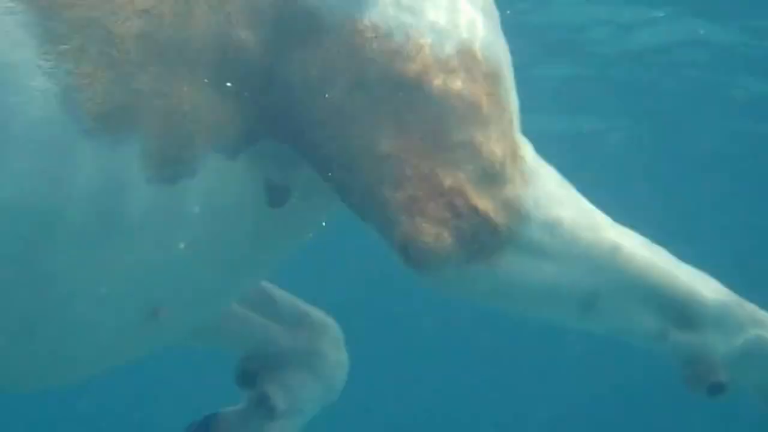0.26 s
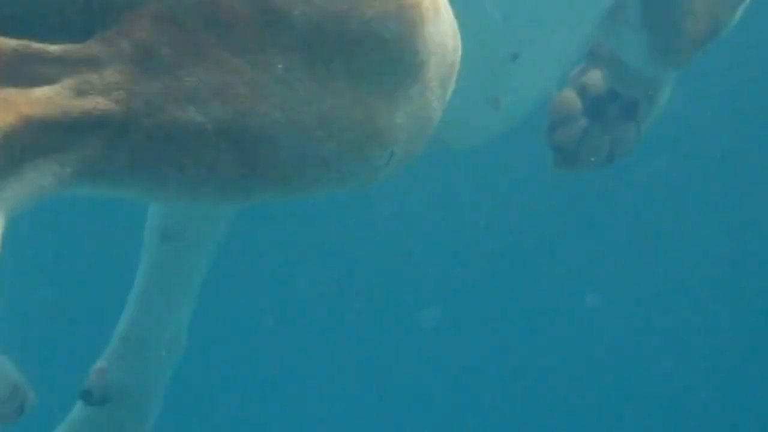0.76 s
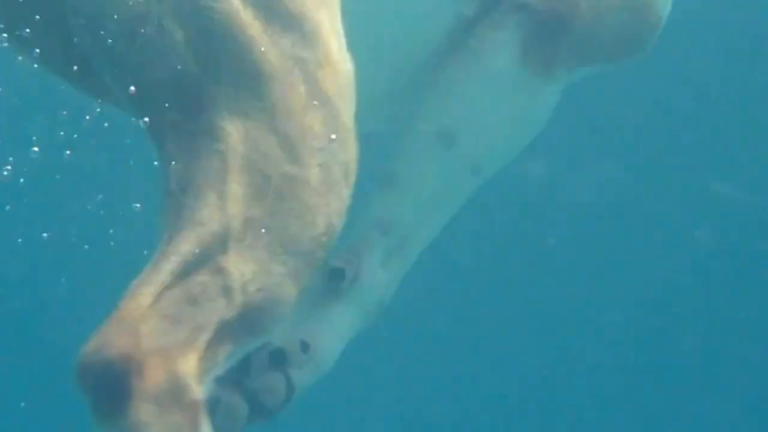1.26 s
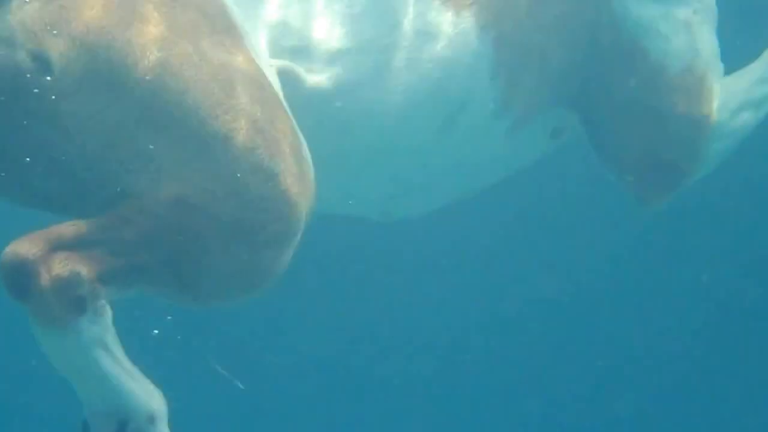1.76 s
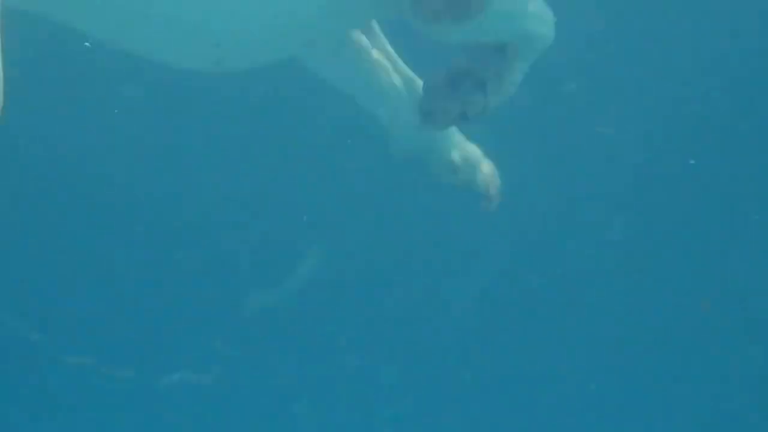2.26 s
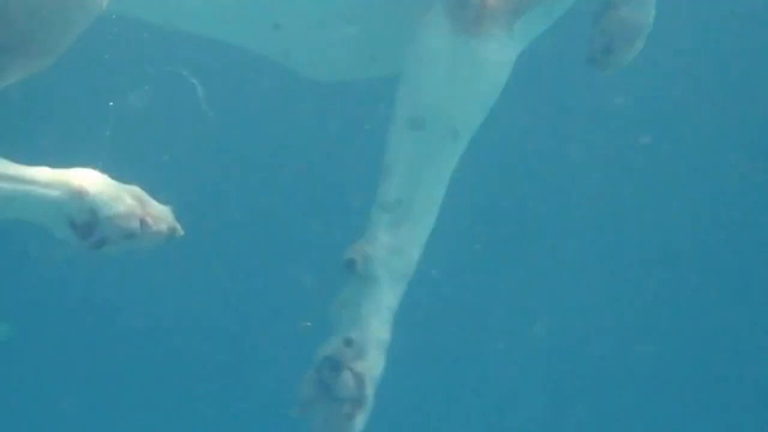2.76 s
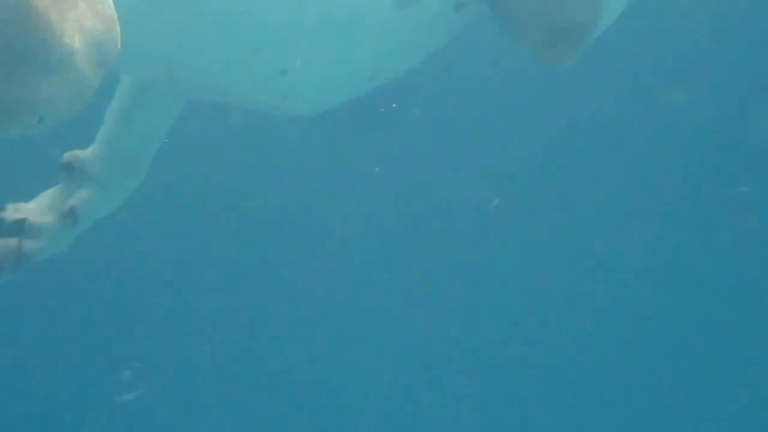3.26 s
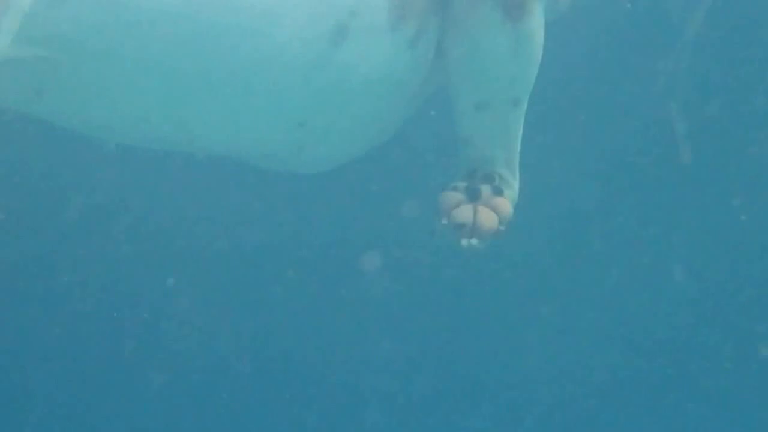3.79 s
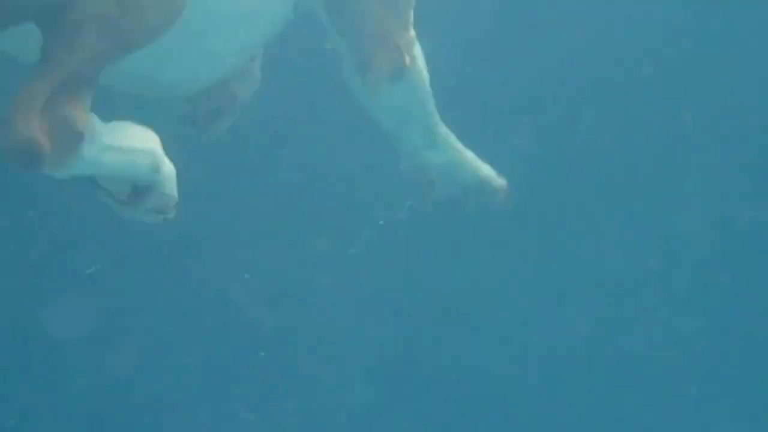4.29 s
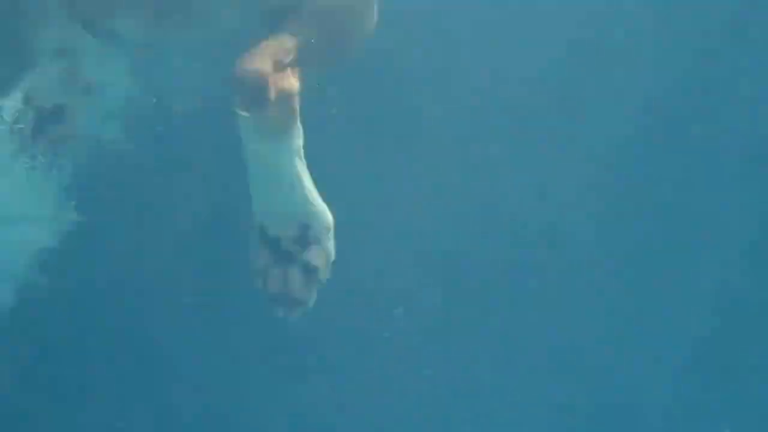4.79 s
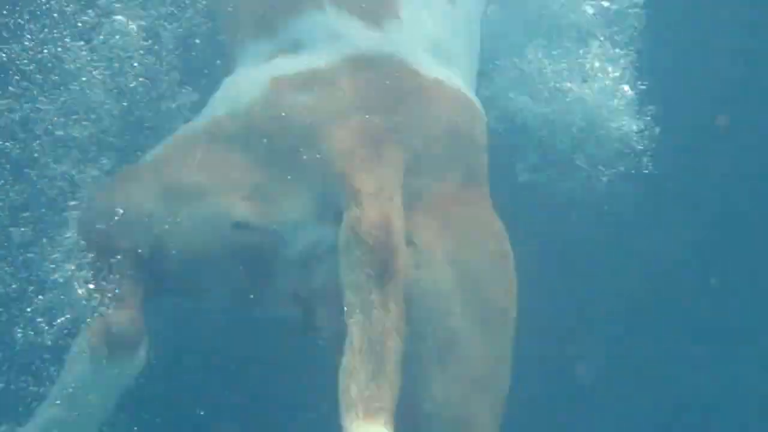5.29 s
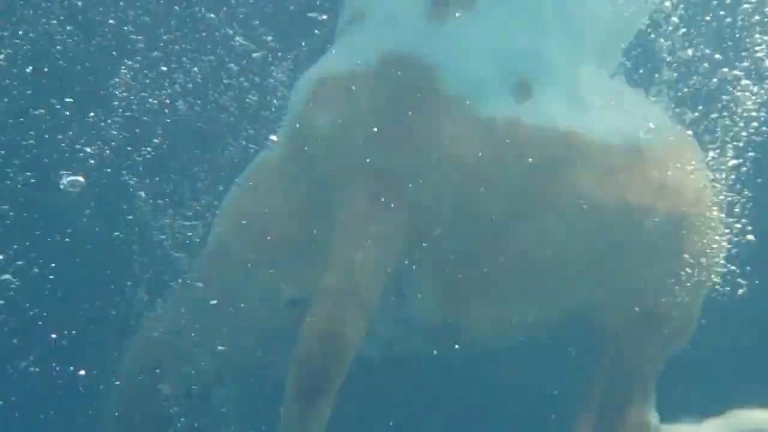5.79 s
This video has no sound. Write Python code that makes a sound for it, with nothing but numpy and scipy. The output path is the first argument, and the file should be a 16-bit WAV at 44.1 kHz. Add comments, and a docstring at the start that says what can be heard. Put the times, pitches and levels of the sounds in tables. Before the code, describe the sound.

Close, boxy underwater pickup with two slightly different sides. Swimming dog legs push water in deep, short resonant bumps, while single bubbles ring as quick plops, chirps and ticks. Activity is heavy at the start and again around two seconds, thins to gurgle, trickle and faint hiss, then ends with brief fizzing swarms and a few dull thumps as hind paws pull air down.

```python
"""A dog paddles in a pool, heard by two microphone ports in a sealed case held under water.
Pushes of water thump the case as decaying flexing modes; bubbles are dying sines that knock its walls.
The legs churn up a low gurgle, a stream along the wall and slow surges, all from coloured noise.
Swarms of small bubbles wash, fizz and chirp; near the end the hind paws drag air down and the fizz swells.
A faint steady hiss lies underneath."""
import sys
import numpy as np
from scipy import signal
from scipy.fft import rfft, irfft, next_fast_len
from scipy.io import wavfile
from scipy.ndimage import uniform_filter1d

SR = 44100
rng = np.random.default_rng(int(sys.argv[2]) if len(sys.argv) > 2 else 0)


def bounce(signal):
    """Save signal as a 16-bit WAV file at the path given by the first command-line argument."""
    frames = np.transpose(np.atleast_2d(signal))
    limited = np.clip(frames, -1, 1)
    pcm = np.round(limited * 32767).astype(np.int16)
    wavfile.write(sys.argv[1], SR, pcm)


N = 266805  # length [samples]

# Pushes of water on the case, the strong ones about one paddling cycle apart:
# (time [s], level [dB], low-pass corner [Hz], boost of the first flexing mode [dB])
THUMPS = [(0.0621, -21, 900, 11), (0.09, -13.5, 712, -2), (0.151, -11, 700, -3), (0.23, -4.5, 840, 5),
          (0.328, -15.5, 814, -10), (.979, -7.5, 235, 15.5), (1.556, -11.5, 410, -15), (1.575, -20, 350, 5),
          (1.9869, -4, 800, 2.5), (1.998, -12, 830, 14.5), (2.824, -22, 700, -2), (2.9667, -5.5, 487, 1),
          (3.5959, -16, 280, 12.5), (3.6257, -15, 270, 16.5), (4.3168, -13.5, 340, 12),
          (4.4696, -25, 603, 3), (4.763, -30.5, 350, 14), (4.9624, -11.5, 426, 12.5),
          (5.510, -10.5, 715, -7), (5.704, -34, 352, 19)]
# The case flexing as a whole: (frequency [Hz], level [dB], t60 [s])
FLEX_MODES = [(268.3, -13.5, 0.16), (314, -3.5, 0.13), (252, -60, 0.0073), (149, -91, 0.006),
              (85.3, -31, 0.12), (384, -17, 0.16), (522, -24.5, 0.12)]
# Loud single bubbles at the case, from deep gulps to ticks:
# (time [s], ring level [dB], starting pitch [Hz], ring t60 [s], knock level [dB], left over right [dB])
POPS = [(0.0135, -13.5, 2790, 0.0061, -21.5, -4), (.063, -11.5, 2370, 0.02, -40, 5),
        (.0643, -5.5, 775, 0.026, -17, -1), (0.0908, -5.5, 1387, 0.055, -34, 0.5),
        (0.0922, -9, 3570, 0.012, -48, -4), (0.091, -3.5, 797, 0.029, -33, -6),
        (0.1092, -26.5, 8060, .0075, -14, 5), (.113, -20, 1750, 0.022, -30, -4),
        (.14, -17, 1260, 0.027, -23, -4), (.149, -15.5, 1220, 0.038, -11.5, -1),
        (0.1816, -23.5, 5740, 0.0078, -29, -5), (0.227, -4, 397, 0.056, -38, -1.5),
        (0.2313, -9, 2510, 0.0078, -7.5, -1.5), (.285, -30, 1244, .06, -28.5, 1),
        (.331, -25, 630, 0.086, -29, 2), (0.4906, 2.5, 4210, 0.0016, -23.5, 4.5),
        (.497, -19.5, 433, 0.062, -46, 0), (0.5815, -23.5, 484, 0.043, -44, 1),
        (.656, -29.5, 423, .09, -41, 0), (.7713, -26.5, 453, 0.038, -26, 1),
        (1.09, -32, 5700, 0.007, -39, 9), (1.475, -15, 3930, 0.012, -35, -10),
        (1.5461, -23, 3230, 0.018, -18, 0), (1.6324, -20, 710, 0.017, -18, -3),
        (1.754, -11, 6060, 0.0054, -24, -3.5), (1.7969, -21, 8500, 0.011, -15.5, 0),
        (1.8091, -13.5, 7800, 0.0064, -15.5, -2), (1.8379, -12, 1966, 0.014, -15, 0.5),
        (1.8654, 7.5, 4540, .006, -9.5, -1), (1.8651, 5, 4950, 0.0075, -12.5, 4),
        (1.874, -20.5, 1410, 0.042, -17, 1), (1.8948, -19.5, 1220, 0.023, -30, 3),
        (1.912, -16, 1350, 0.01, -29, -6), (1.9468, -10.5, 1003, 0.022, -22, -0.5),
        (1.968, -24, 7700, 0.0051, -28, 0), (1.9877, -6, 480, 0.029, -35, 0),
        (1.9882, -5.5, 2345, .011, -13, -12), (1.9995, -6, 480, .046, -6, 2),
        (2.013, -12, 2780, 0.026, -13, -1.5), (2.029, -14.5, 1396, 0.042, -9.5, -3),
        (2.0747, -7.5, 1340, 0.023, -11, -3), (2.077, -6.5, 3240, 0.015, -15, 5.5),
        (2.111, -31, 2710, 0.021, -22, 2), (2.203, -26.5, 425, 0.16, -57, 0.5),
        (2.331, -27, 8800, .006, -19, 0), (2.3515, -18.5, 1266, .13, -5, -4),
        (2.356, -10, 2180, 0.033, -7, -3.5), (2.3658, -12.5, 2220, .019, -13, 0),
        (2.38, -9.5, 1930, 0.012, -16, -1), (2.3983, -11.5, 2250, 0.011, -25, -1),
        (2.4502, -20.5, 1257, 0.044, -17, 0), (2.526, -15, 1333, 0.04, -32, 2),
        (2.533, -13.5, 1285, 0.062, -24, -5), (2.539, -13.5, 1735, 0.028, -10, 3),
        (2.6425, -27.5, 1770, .024, -47, -5), (2.652, -29.5, 4240, 0.0099, -34, -15),
        (2.7017, -24, 470, 0.028, -30, 1), (2.7312, -19.5, 4830, 0.0047, -38, -7),
        (2.7496, -32.5, 2630, .08, -23, 2), (2.8632, -22, 475, .16, -47, 0.5),
        (2.882, -18.5, 4260, 0.025, -23.5, -3), (2.9705, -16.5, 877, 0.049, -13.5, -2),
        (3.1542, -35, 2110, .015, -28, -8), (4.1665, -28, 2620, .037, -55, -1),
        (4.5432, -29.5, 2420, 0.049, -49, -1), (4.777, -23, 2640, 0.068, -21, -4),
        (4.9873, -9, 3120, 0.0043, -28, 2), (5.004, -16.5, 443, 0.02, -41, 2),
        (5.324, -25.5, 82, 0.065, -50, -2), (5.512, -16.5, 96, 0.059, -13, 1),
        (5.68, -28, 842, 0.04, -20.5, 5.5), (5.715, -22, 2510, 0.021, -23, 3),
        (5.739, -21.5, 2670, .02, -43, 3), (5.761, -18.5, 2540, 0.029, -27, -1)]
# The walls of the case ringing: (frequency [Hz], level [dB], t60 [s])
WALL_MODES = [(813, -21.5, 0.03), (890, -9.5, 0.024), (1260, -13.5, 0.041), (1400, -22.5, 0.057),
              (1730, -17, 0.022), (2260, -11.5, 0.017), (2710, -16.5, 0.026), (3150, -9, 0.015),
              (4060, -4, 0.0058), (5080, -1, 0.0026), (7370, -7, 0.0025), (12000, -16, 0.0024)]
FRAGMENT_TOP_DB = -6.5  # bubbles louder than this shed no louder fragments
FRAGMENT_LOW_HZ = 600  # deeper gulps stay in one piece

# Puffs of bubbles where a paw breaks the surface:
# (time [s], fizz level [dB], wash level [dB], rise time constant [s], fade time constant [s])
SPLASHES = [(2.231, -33.5, -67, .004, 0.042), (2.352, -32, -35, 0.0025, 0.0075),
            (2.526, -54, -20.5, .003, 0.014), (2.565, -46, -25, 0.0027, 0.0084),
            (2.825, -82, -39, 0.0047, 0.04), (4.751, -23.5, -34, 0.0068, 0.026),
            (4.772, -18, -55, 0.009, 0.016), (4.975, -38.5, -43, 0.0082, 0.067),
            (5.141, -26.5, -27.5, 0.0088, .016), (5.199, -20, -58, 0.0027, 0.0043),
            (5.283, -38, -27, 0.011, 0.041), (5.708, -27.5, -70, 0.0075, 0.014),
            (5.758, -22, -57, 0.0016, 0.0039), (5.981, -54, -24, 0.0051, 0.015),
            (6.019, -22.5, -57, 0.016, 0.054)]
# Wash of larger bubbles between splashes: (time [s], level [dB])
WASH_LEVEL = [(0, -38), (.15, -38), (.4, -44.5), (.9, -47.5), (1.2, -46), (1.6, -40.5), (1.76, -65),
              (2.02, -50), (2.22, -49.5), (2.55, -40.5), (2.7, -49.5), (4.35, -49.5), (4.68, -63),
              (4.92, -37.5), (5.13, -37.5), (5.24, -53), (5.56, -39.5), (6.05, -54.5)]
# Fizz of fine bubbles, swelling as the hind paws drag air down: (time [s], level [dB])
FIZZ_LEVEL = [(0, -51.5), (.65, -46), (1.2, -52.5), (1.48, -42.5), (1.8, -48.5), (2.2, -45.5), (3, -45),
              (3.7, -49), (4.1, -46.5), (4.7, -52), (4.97, -37.5), (5.12, -36), (5.3, -48.5), (5.58, -41.5),
              (5.85, -42.5), (6.05, -34.5)]
# Colour of the wash: (frequency [Hz], relative level [dB per Hz])
WASH_COLOUR = [(120, -58), (300, -32), (520, -11.5), (680, -20), (830, 8.5), (1000, 1.5), (1130, -6),
               (1360, 6), (1540, -7), (1750, -3), (2100, -21), (3000, 17), (9000, -69)]
# Colour of the fizz and the stray bubbles: (frequency [Hz], relative level [dB per Hz])
FIZZ_COLOUR = [(1060, -1.5), (1800, -2), (2110, -8.5), (2570, -1), (2880, -6.5), (3960, -0.5),
               (4530, -10.5), (5460, -4), (6070, -10), (6750, -5.5), (7710, -10), (8280, -15),
               (10400, -23.5), (14100, -24), (15000, -67)]

# A leg sweeps past the case:
# (time [s], length [s], eddy level before the trim in eddies() [dB], stream level [dB])
SWEEPS = [(0.02, 0.32, -30.5, -58), (0.907, 0.034, -31, -70), (0.97, 0.68, -30, -42),
          (1.878, 0.15, -26, -52), (2.197, 0.16, -32, -73), (2.821, 0.062, -33.5, -40.5),
          (3.02, .06, -63, -44), (3.97, 0.043, -46, -72), (4.768, 0.031, -36, -44),
          (5.02, 0.13, -44.5, -43.5), (5.375, 0.029, -41, -47)]
SWEEP_RISE_S, SWEEP_FADE_S = 0.014, 0.033  # time constants: flow builds quickly, dies once the leg has passed
# Low gurgle that lingers between sweeps: (time [s], level [dB])
EDDY_LEVEL = [(0, -36), (.45, -37.5), (.8, -47), (1.7, -45), (2.4, -42.5), (2.65, -52), (3.05, -47),
              (3.3, -59), (4.1, -54), (4.65, -59), (5.2, -57.5), (6.05, -48)]
# Colour of the gurgle: (frequency [Hz], relative level [dB per Hz])
GURGLE_COLOUR = [(40, -54), (130, -33), (200, -11.5), (240, -5), (268, 5), (288, -4.5), (312, 8), (350, -6),
                 (410, -9.5), (520, -27), (700, -29), (2000, -101)]
# Colour of the stream along the wall: (frequency [Hz], relative level [dB per Hz])
STREAM_COLOUR = [(200, -52), (650, -25), (860, 9), (1050, 4.5), (1270, -1.5), (1380, 12.5), (1500, -4.5),
                 (1750, 1.5), (2200, -9), (2900, -34.5), (5000, -47), (14000, -65)]
# Slow swells of pressure from the kicks: (time of the top [s], half width at 1/e [s], level [dB])
SURGES = [(.2, .14, -54), (.55, 0.085, -39), (.91, 0.12, -51), (3.66, .05, -49), (4.02, .03, -55),
          (4.44, 0.21, -57), (5.06, 0.14, -46), (5.34, 0.049, -44)]
SURGE_FLOOR_DB = -61.5  # the pool is never quite still
# Colour of the surges: (frequency [Hz], relative level [dB per Hz])
SURGE_COLOUR = [(15, -11), (35, 5), (55, 10), (80, 5), (125, -6), (175, -1.5), (240, 2), (400, -41),
                (1500, -82)]
# Colour of the faint steady hiss: (frequency [Hz], relative level [dB per Hz])
HISS_COLOUR = [(200, -36), (2000, -15), (6500, 0), (9000, -3.5), (14000, -7.5)]
HISS_DB = -60.5

# The two ports behind the wall, phase: (frequency [Hz], lead of the left [rad])
PORT_PHASE = [(380, 0), (560, -.4), (700, 1.9), (870, 2.4), (1030, 5.5), (1400, 5.9), (2150, 8.1),
              (2600, 6.5), (3600, 5.3), (4500, 4.4), (5500, 7.4), (7000, 5.8)]
# Their balance: (frequency [Hz], left over right [dB])
PORT_BALANCE = [(40, -6.5), (130, 1), (400, 0.2), (560, -3.5), (770, 6.5), (1170, -0.5), (1790, -4),
                (2740, 8), (4190, -0.5), (6410, 1.5), (9810, 5.5), (15000, 2.5)]
# Their likeness, for diffuse sounds: (frequency [Hz], correlation [0 to 1])
PORT_LIKENESS = [(60, 0.84), (300, 1), (650, 0.7), (1400, 0.77), (3000, 0.72), (7000, 0.39), (14000, 0.12)]
EDGE_HZ, FIZZ_EDGE_HZ = 15700, 14400  # top of the whole mix; top of the bubble clouds and the hiss


def amp(db):
    """Turns decibels into a gain."""
    return 10 ** (np.asarray(db) / 20)


def evened(x):
    """Scales to rms 1."""
    return x / np.sqrt(np.mean(x ** 2) + 1e-20)


def read(points, hz):
    """Reads a table on a log-frequency axis."""
    f, value = np.transpose(points)
    return np.interp(np.log(hz + 1), np.log(f + 1), value)


def level(curve):
    """Turns a level curve in dB into a gain for every sample."""
    s, db = np.transpose(curve)
    return amp(np.interp(np.arange(N) / SR, s, db))


def add(mix, s, sound):
    """Mixes a sound in at time s."""
    part = mix[..., max(round(s * SR), 0):][..., :sound.shape[-1]]
    part += sound[..., :part.shape[-1]]


def ring(hz, t60, glide=0):
    """A dying sine, a quarter second long; glide is the share its pitch rises over t60."""
    t = np.arange(SR // 4) / SR
    rise = 1 + glide * np.minimum(t / t60, 1)
    phase = 2 * np.pi * np.cumsum(hz * rise) / SR
    return amp(-60 * t / t60) * np.sin(phase)


def soften(x, hz):
    """Two gentle low-passes: the contact takes time."""
    r = np.exp(-2 * np.pi * hz / SR)
    return signal.lfilter([(1 - r) ** 2], [1, -2 * r, r * r], x)


def cut_above(x, hz):
    """Steep low-pass."""
    taps = signal.firwin(255, hz, window=("kaiser", 9), fs=SR)
    return signal.oaconvolve(x, taps[None], "same")


def colour(pair, spectrum):
    """Gives two unrelated signals a spectrum and makes them partly alike, at rms 1."""
    hz = np.fft.rfftfreq(N, 1 / SR)
    left, other = rfft(pair)
    same = np.clip(read(PORT_LIKENESS, hz), -1, 1)
    right = same * left + np.sqrt(1 - same ** 2) * other
    return evened(irfft(np.array([left, right]) * amp(read(spectrum, hz)), N))


def lumps(depth_db, size):
    """A random gain that wanders over about size samples, depth_db rms."""
    wander = uniform_filter1d(uniform_filter1d(rng.standard_normal(N), size), size)
    return amp(depth_db * evened(wander))


def swarm(per_s, spread_db, low_hz, high_hz, cycles, count=28):
    """Many small bubbles of count pitches and random levels, in a random polarity at each port; rms 1."""
    out = np.zeros((2, N))
    for hz in np.geomspace(low_hz, high_hz, count):
        born = rng.random(N) < per_s / count / SR
        births = born * amp(spread_db * np.minimum(rng.exponential(1, N), 3.5))
        bubble = evened(ring(hz, cycles / hz, 0.096)[:3000])
        polarity = rng.choice([-1, 1], (2, N))
        out += signal.oaconvolve(births * polarity, bubble[None], axes=1)[:, :N]
    return evened(out)


def thumps(leak_hz=120):
    """Each push flexes the case; close modes beat as they die, and the slowest pressure leaks away."""
    out = np.zeros(N)
    modes = np.array([amp(db) * ring(hz, t60) for hz, db, t60 in FLEX_MODES])
    for s, db, soft_hz, boost_db in THUMPS:
        flex = amp(boost_db) * modes[0] + modes[1:].sum(0)
        add(out, s, amp(db) * soften(flex, soft_hz))
    return signal.sosfilt(signal.butter(2, leak_hz, "highpass", fs=SR, output="sos"), out)


def pops(glide=0.055, onset_cycles=0.44, knock_onset_s=0.00029, octave_db=-3.5, scatter_db=-13, scatter_t60=0.018):
    """A bubble rings at its own pitch and knocks the walls; the surface scatters a short tail."""
    out, t = np.zeros((2, N)), np.arange(SR // 4) / SR
    knock_onset = 1 - np.exp(-(t / knock_onset_s) ** 2)
    walls = np.array([amp(db) * ring(hz, t60) for hz, db, t60 in WALL_MODES]) * knock_onset
    wall_hz = np.transpose(WALL_MODES)[0]
    for s, ring_db, hz, t60, knock_db, pan_db in POPS:
        # modes near the bubble's pitch ring most, and every spot on the case excites them differently
        octaves_away = abs(np.log2(wall_hz / hz))
        share_db = 3.5 + octave_db * octaves_away + 3.44 * rng.standard_normal((2, len(WALL_MODES)))
        knock = (rng.choice([-1, 1], len(WALL_MODES)) * amp(share_db)) @ walls
        bubble = ring(hz, t60, glide) * (1 - np.exp(-t * hz / onset_cycles))
        pan = amp([[pan_db / 2], [-pan_db / 2]])
        add(out, s, pan * (amp(ring_db) * bubble + amp(knock_db) * knock))
    # noise tail that starts 2 ms behind the pop
    tail = rng.standard_normal((2, len(t))) * amp(-60 * t / scatter_t60) * (t > .002)
    tail /= np.linalg.norm(tail[0])
    return out + amp(scatter_db) * signal.oaconvolve(out, tail, axes=1)[:, :N]


def fragments(count=3, spread_s=.03, fragment_db=-18, cycles=45, octaves=0.393, glide=.05):
    """A bursting bubble sheds a few small ones, which ring around its pitch just after it."""
    out, t = np.zeros((2, N)), np.arange(SR // 4) / SR
    draws = rng.standard_normal((len(POPS), 3, count))
    for (s, ring_db, hz, *_), (wait, size, place) in zip(POPS, draws):
        if hz < FRAGMENT_LOW_HZ:
            continue
        gain = amp(min(ring_db, FRAGMENT_TOP_DB) + fragment_db)
        delays = spread_s * abs(wait)
        pitches = hz * 2 ** (octaves * np.tanh(size))
        for delay, pitch, pan in zip(delays, pitches, np.tanh(place)):
            bubble = ring(pitch, cycles / pitch, glide) * (1 - np.exp(-t * pitch))
            add(out, s + delay, gain * np.sqrt([[1 + pan], [1 - pan]]) * bubble)
    return out


def cloud_gains():
    """Gains of wash and fizz: slow curves plus a puff of bubbles for each splash."""
    t = np.arange(N) / SR
    wash, fizz = level(WASH_LEVEL), level(FIZZ_LEVEL)
    for start, fizz_db, wash_db, rise, fade in SPLASHES:
        age = np.maximum(t - start, 0)
        puff = (1 - np.exp(-age / rise)) * np.exp(-age / fade)
        fizz += amp(fizz_db) * puff
        wash += amp(wash_db) * puff
    return wash, fizz


def bubble_clouds(stray_db=-51.5):
    """Larger bubbles wash, fine ones fizz, and stray ones chirp close by; noise fills the swarms."""
    wash, fizz = cloud_gains()
    large = swarm(per_s=1300, spread_db=4.5, low_hz=489.4, high_hz=2416, cycles=57)
    large += 0.13 * rng.standard_normal((2, N))
    fine = swarm(per_s=3000, spread_db=3.5, low_hz=2046, high_hz=11830, cycles=99)
    fine += 0.47 * rng.standard_normal((2, N))
    strays = swarm(per_s=80, spread_db=3.5, low_hz=1715, high_hz=8920, cycles=48)
    out = wash * colour(large, WASH_COLOUR)
    out += fizz * colour(fine * lumps(depth_db=2.5, size=500), FIZZ_COLOUR)
    out += amp(stray_db) * colour(strays, FIZZ_COLOUR)
    return cut_above(out, FIZZ_EDGE_HZ)


def sweep_flow():
    """Gains of the eddies and of the stream: each sweep rises, holds and fades."""
    t, flow = np.arange(N) / SR, np.zeros((2, N))
    for s, length, eddy_db, stream_db in SWEEPS:
        age = np.maximum(t - s, 0)
        rise = 1 - np.exp(-age / SWEEP_RISE_S)
        fade = np.exp(-np.maximum(age - length, 0) / SWEEP_FADE_S)
        flow += amp([[eddy_db], [stream_db]]) * rise * fade
    return flow


def eddies(sweep_trim_db=-3.0):
    """Eddies hum unevenly in the flexing case, most while a leg sweeps by."""
    gain = level(EDDY_LEVEL) + amp(sweep_trim_db) * sweep_flow()[0]
    churn = rng.standard_normal((2, N)) * lumps(depth_db=1.5, size=1100)
    return gain * colour(churn, GURGLE_COLOUR)


def gulps(per_s=45, gulp_db=-9):
    """Big soft bubbles burble in the lingering eddies, alike at both ports."""
    burble = swarm(per_s, spread_db=-1.5, low_hz=364, high_hz=735, cycles=8, count=12)[0]
    return amp(gulp_db) * level(EDDY_LEVEL) * burble


def stream(trickle_db=-57):
    """Water rushes smoothly along the wall: a constant trickle that grows with each sweep."""
    flow = rng.standard_normal((2, N)) * lumps(depth_db=2.0, size=600)
    return (amp(trickle_db) + sweep_flow()[1]) * colour(flow, STREAM_COLOUR)


def surge():
    """Each kick sends a smooth swell of low pressure, made of low noise."""
    t = np.arange(N) / SR
    swell = amp(SURGE_FLOOR_DB) + sum(amp(db) * np.exp(-((t - s) / width) ** 2) for s, width, db in SURGES)
    return swell * colour(rng.standard_normal((2, N)), SURGE_COLOUR)


def hiss():
    """A faint steady bed of coloured noise."""
    return amp(HISS_DB) * cut_above(colour(rng.standard_normal((2, N)), HISS_COLOUR), FIZZ_EDGE_HZ)


def scene():
    """All sound passes the case wall, which turns phase and level differently for each port."""
    mix = thumps() + pops() + fragments() + bubble_clouds()
    mix += eddies() + gulps() + stream() + surge() + hiss()
    size = next_fast_len(N + 4096)
    hz = np.fft.rfftfreq(size, 1 / SR)
    balance = amp(read(PORT_BALANCE, hz) / 2)
    ports = np.array([balance, np.exp(-1j * read(PORT_PHASE, hz)) / balance])
    return irfft(rfft(mix, size) * ports, size)[:, :N]


def record(dry):
    """The loudest peaks overload the input and clip; then the band limit."""
    return cut_above(np.clip(dry, -1, 1), EDGE_HZ)


dry = scene()
out = record(dry)
bounce(out)
```